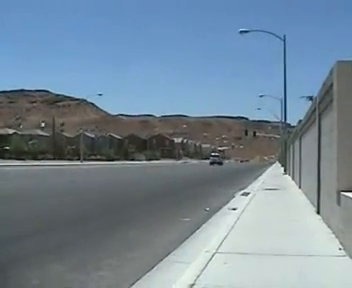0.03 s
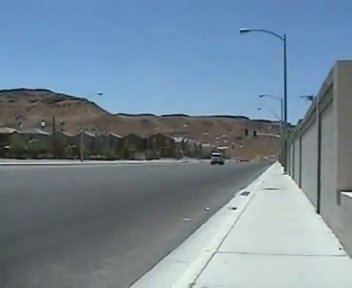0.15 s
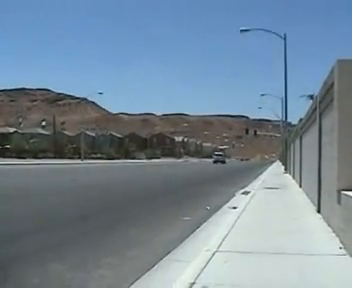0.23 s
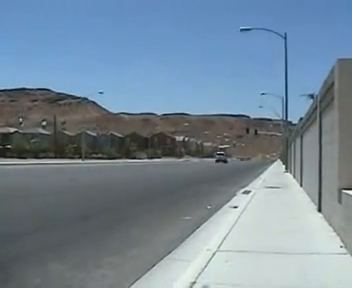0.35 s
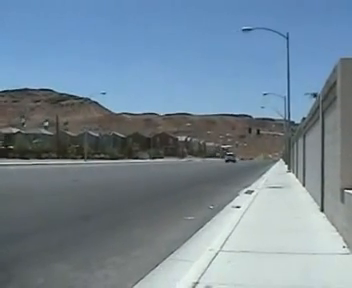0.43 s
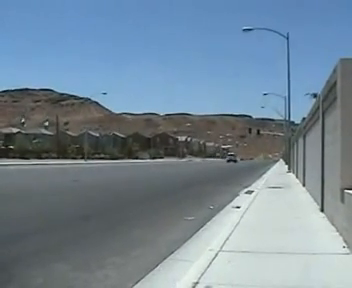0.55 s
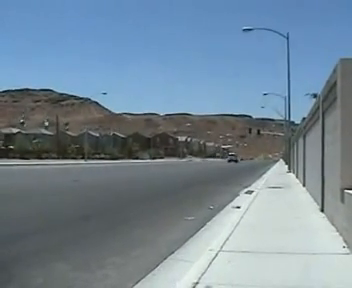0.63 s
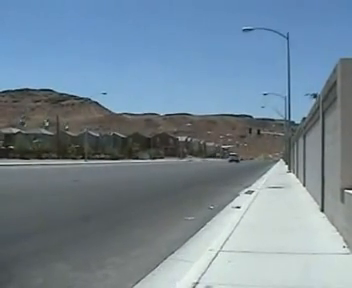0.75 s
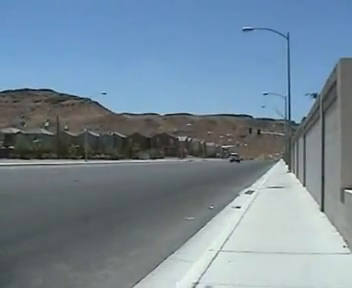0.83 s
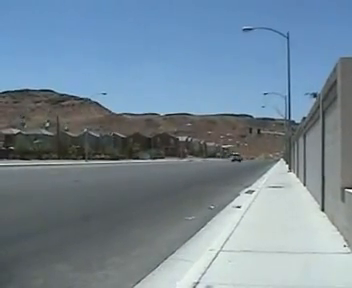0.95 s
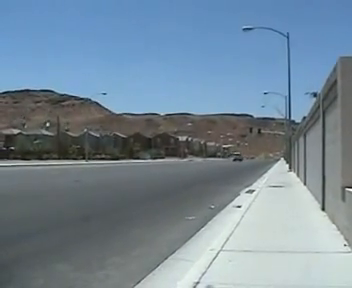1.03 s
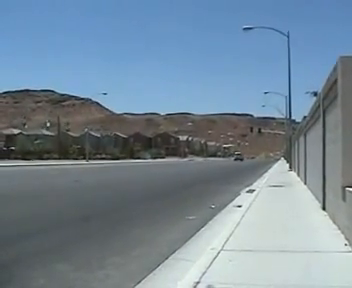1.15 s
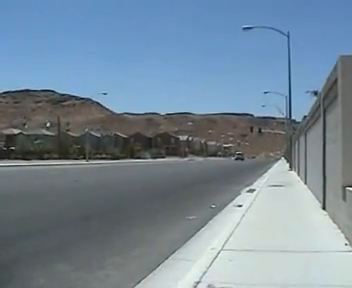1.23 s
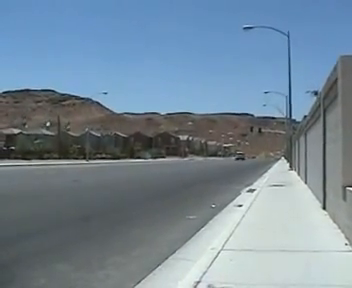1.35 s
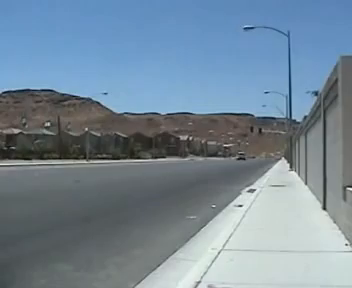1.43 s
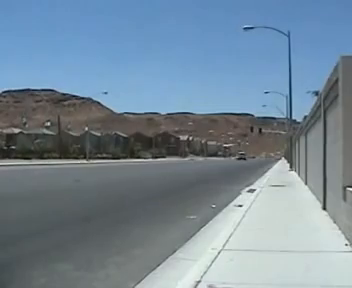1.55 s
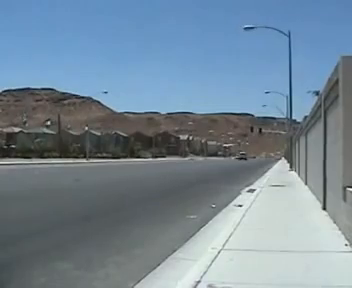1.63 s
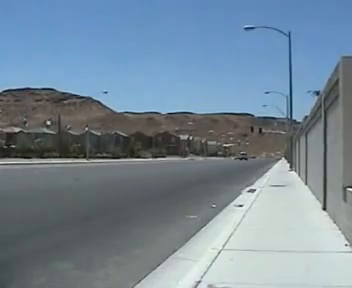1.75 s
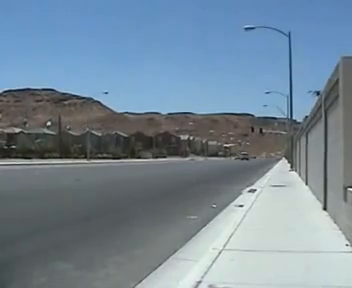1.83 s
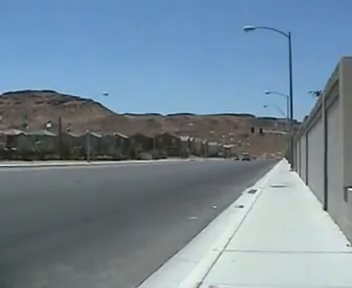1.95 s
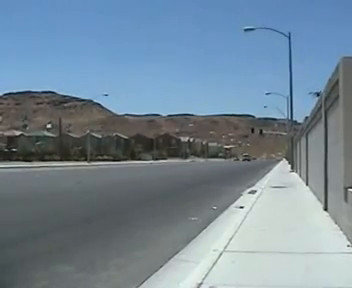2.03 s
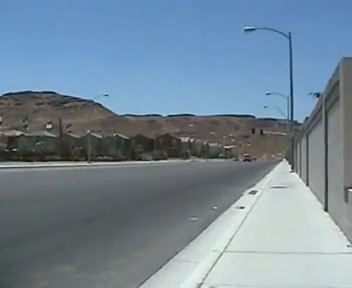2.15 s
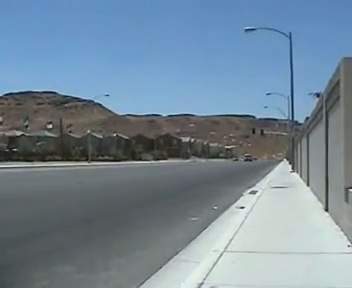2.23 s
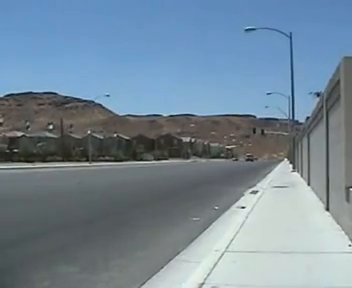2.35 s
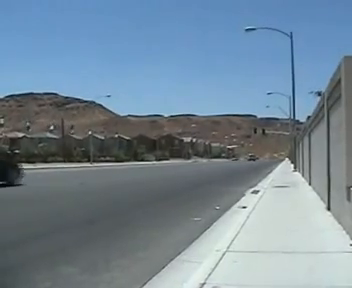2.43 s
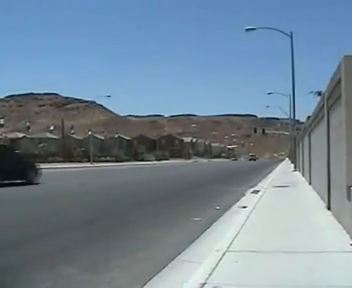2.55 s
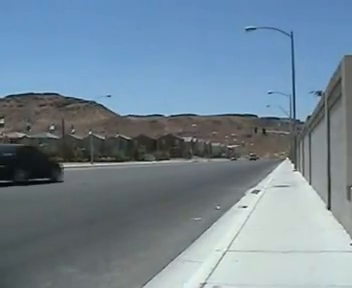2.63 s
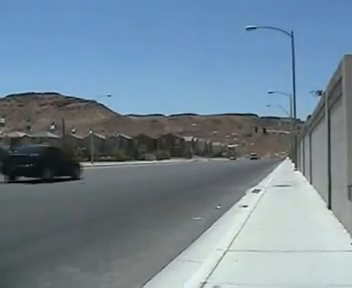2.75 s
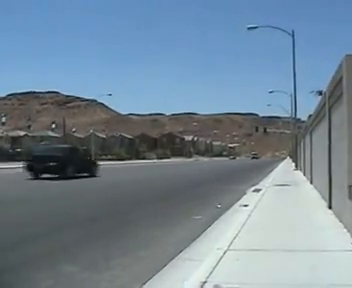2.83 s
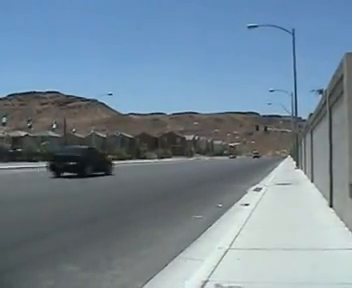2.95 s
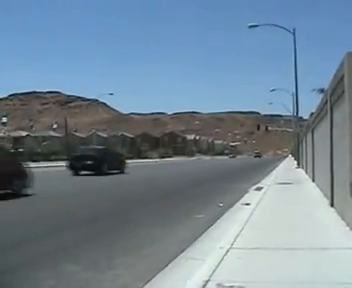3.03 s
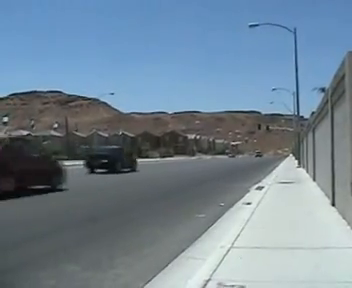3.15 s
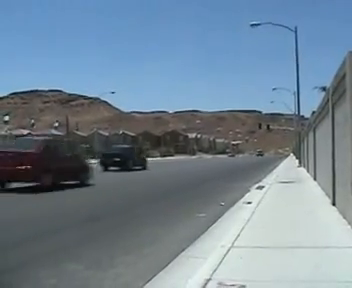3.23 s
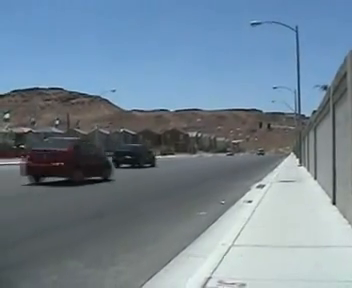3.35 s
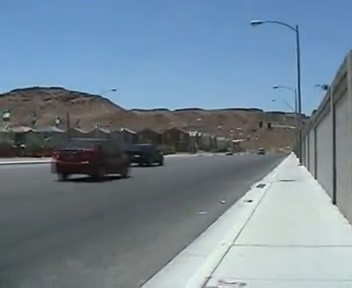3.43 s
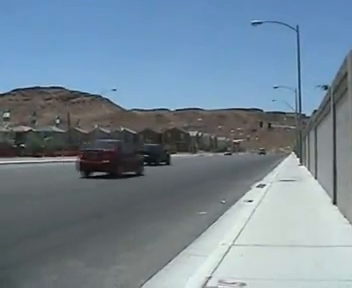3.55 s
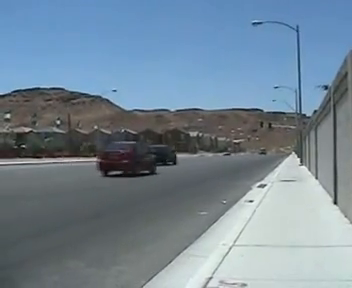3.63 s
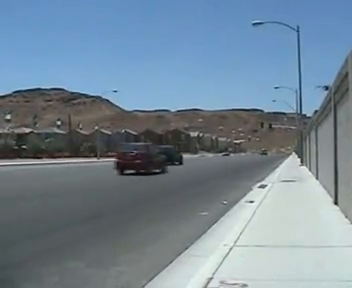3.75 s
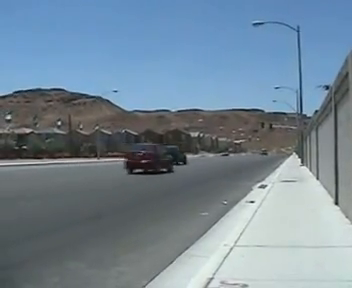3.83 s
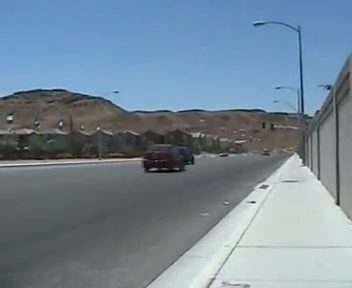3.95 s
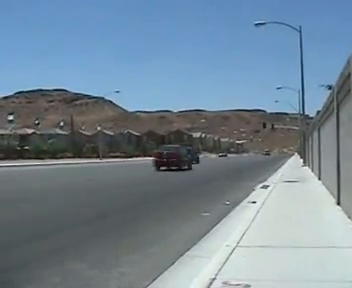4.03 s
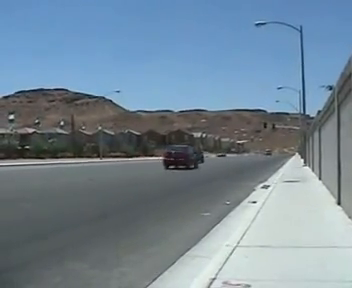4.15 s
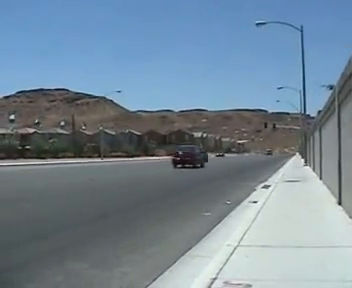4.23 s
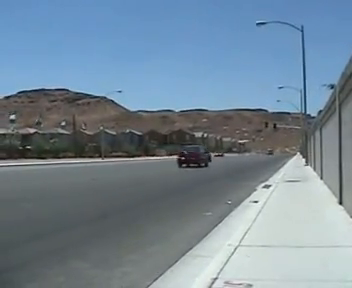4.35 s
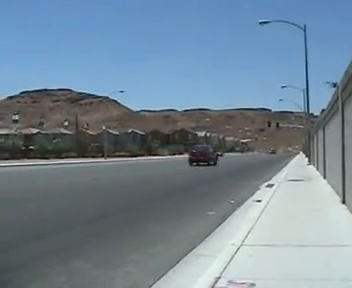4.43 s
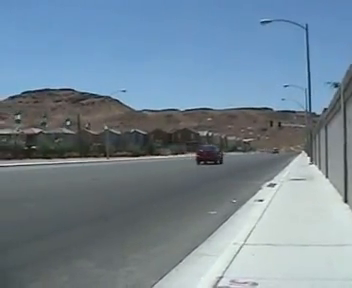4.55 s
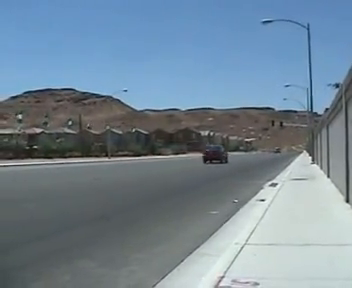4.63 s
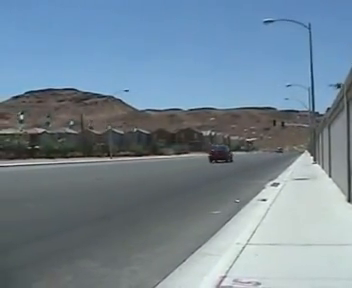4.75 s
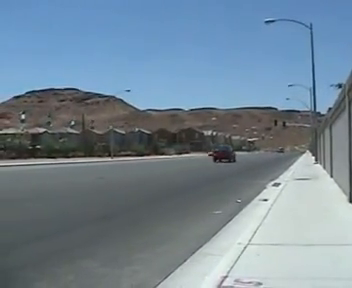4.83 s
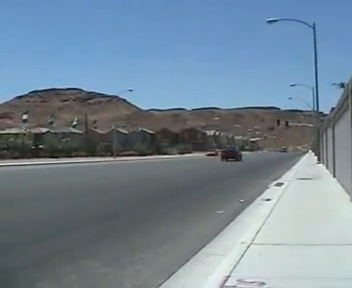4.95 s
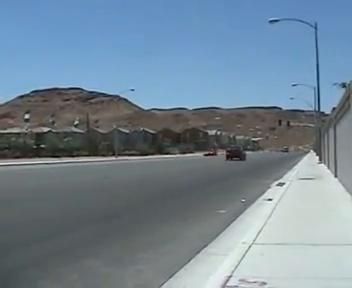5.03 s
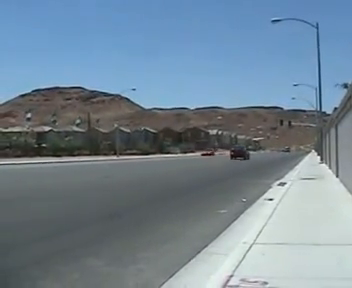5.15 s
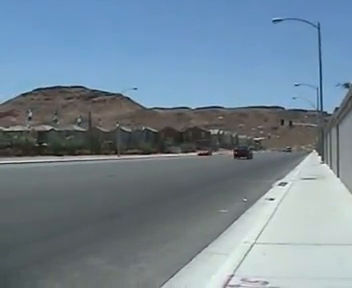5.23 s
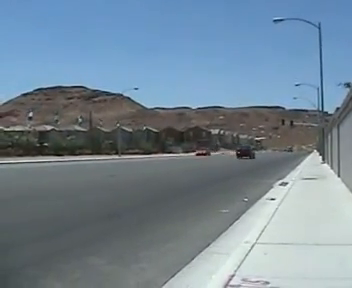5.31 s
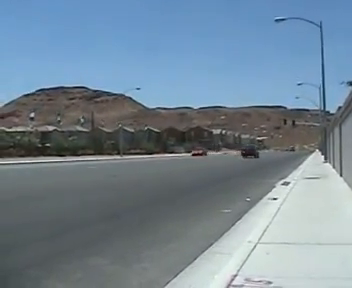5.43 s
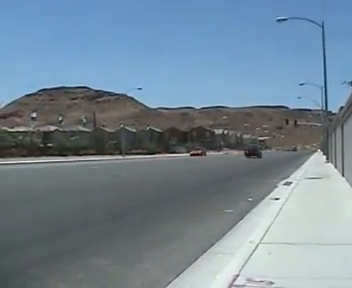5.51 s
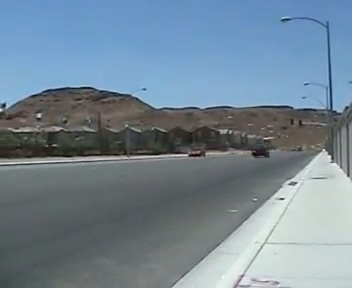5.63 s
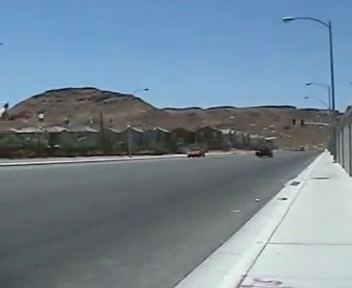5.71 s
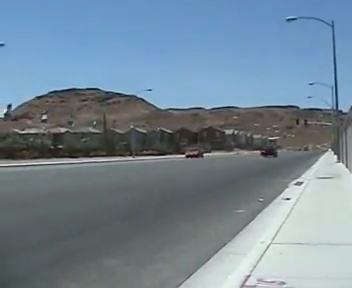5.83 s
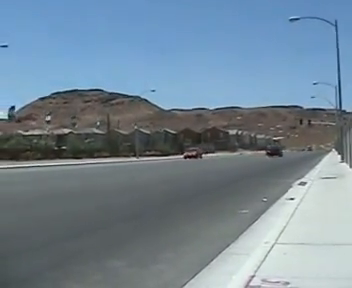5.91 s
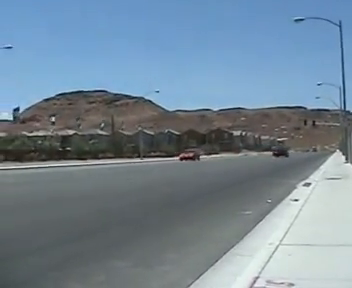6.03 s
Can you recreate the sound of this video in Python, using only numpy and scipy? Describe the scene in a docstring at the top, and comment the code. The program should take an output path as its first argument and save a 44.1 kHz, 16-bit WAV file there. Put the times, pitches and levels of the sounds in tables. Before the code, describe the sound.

A loud-exhaust four-cylinder car pulls hard, shifts up around the middle as another car rushes past, then lifts off with falling note and tyre chirps.

```python
"""From the start a four-cylinder car with a loud exhaust pulls beside a garden wall, over tyre roar, wind and rumble.
A second car then rushes past, its drone falling by the Doppler effect, while the first changes gear and faint
crackles of an overloaded input are heard. Late on come a tick, the throttle lift with an octave growing over the
falling note, and slip-and-grip tyre chirps. Tones are sines partly scattered by random modulation; roar, gas noise,
hiss, wind and crackles are shaped random noise. The input stage rounds the highest peaks throughout."""
import sys
import numpy as np
from scipy import signal
from scipy.fft import rfft, irfft, next_fast_len
from scipy.io import wavfile
from scipy.ndimage import uniform_filter1d, map_coordinates

SR = 44100
rng = np.random.default_rng(int(sys.argv[2]) if len(sys.argv) > 2 else 0)


def wrap_up_sound(samples):
    """Save the sound to the file named by the first command line argument, as 16-bit audio."""
    columns = np.atleast_2d(samples).T
    # keep every value between -1 and 1, then stretch to whole-number steps
    tamed = np.clip(columns, -1, 1)
    steps = np.round(tamed * 32767).astype(np.int16)
    wavfile.write(sys.argv[1], SR, steps)


N = 268128
T = np.arange(N) / SR  # time in seconds

# Engine speed and exhaust note. Each row: time in seconds, firing rate in Hz, note level in dB.
ENGINE_NOTE = [(0, 231, -25), (.1, 233.5, -24.5), (.45, 241.8, -26), (.84, 256, -19), (1.2, 268, -20.5),
               (1.47, 274.7, -18), (1.8, 286.7, -18), (2.2, 297.4, -15.5), (2.33, 299.5, -26.5),
               (2.5, 286.7, -23), (2.6, 278.8, -24), (2.66, 276, -16.5), (2.71, 271, -30),
               (2.78, 264.7, -33), (2.86, 235.4, -18), (2.96, 221, -19), (3.4, 230.8, -17.5),
               (3.8, 236.1, -20.5), (4.25, 246.2, -16.5), (4.66, 250, -17), (4.8, 251.2, -21),
               (5.05, 257.1, -18), (5.21, 255.2, -21), (5.23, 267.3, -16), (5.52, 232.7, -15.5),
               (5.75, 197, -12), (5.96, 171.1, -18.5), (6.08, 153.2, -10.5)]
# Brief drop-outs of the note. Each row: centre in seconds, half length (to 1/e) in seconds, depth in dB.
NOTE_DROPOUTS = [(0.315, 0.089, 10), (0.927, 0.045, 20), (1.062, 0.03, 14), (1.33, 0.027, 13),
                 (1.402, 0.03, 18), (1.567, 0.019, 13), (1.673, 0.013, 9), (1.858, 0.023, 16),
                 (1.992, 0.024, 13), (2.12, 0.045, 9), (2.416, 0.047, 8), (2.591, .025, 6),
                 (2.81, 0.033, 10), (3.087, .015, 7), (3.236, .015, 5), (3.524, 0.037, 15), (4.564, .03, 5),
                 (4.74, 0.012, 13), (5.017, .02, 6), (5.221, 0.0096, 19), (5.327, 0.0046, 16)]
# Growl under load. Each row: time in seconds, 3rd multiple of the cycle rate in dB, 5th in dB, rasp in dB.
GROWL_LEVELS = [(0, -42, -39.5, -41), (.85, -43.5, -38.5, -43), (.98, -26, -45, -37.5),
                (1.27, -26.5, -33.5, -41), (1.38, -48, -38.5, -46), (1.55, -36.5, -33.5, -48),
                (2.1, -29.5, -42, -37), (2.27, -25, -38, -35), (2.35, -35, -36, -35),
                (2.46, -22.5, -38, -33), (2.6, -35, -39, -28), (2.75, -25, -36, -29),
                (2.95, -49, -33, -34.5), (3.3, -38, -36, -27.5), (3.5, -38, -39, -27),
                (3.8, -37.5, -40, -28.5), (3.95, -34, -36, -28.5), (4.15, -29, -32, -29),
                (4.45, -29, -26.5, -35.5), (4.56, -28.5, -31, -28), (5.0, -27.5, -33.5, -27),
                (5.27, -28, -33, -29)]
# Upper lines of the growl. Each row: multiple of the cycle rate, level in dB relative to the rasp.
RASP_LINES = [(10, -12), (11, -1.5), (12, -5), (13, -14.5)]
# Colour of the gas noise from the tailpipe. Each row: frequency in Hz, relative density in dB per Hz.
PIPE_SPECTRUM = [(350, -43), (600, -1.5), (750, 6), (900, -13), (1100, 3.5), (1400, -15), (3000, -21),
                 (6000, -120)]
# Whines near 1 kHz. Each row: start in seconds, length in seconds, start pitch in Hz, end pitch in Hz, level in dB.
WHINE_GLIDES = [(.85, 0.28, 899, 908, -33.5), (3.75, .16, 1155, 1105, -26), (3.97, 0.062, 1140, 1165, -28),
                (4.53, .36, 1072, 1082, -29), (4.96, .17, 1069, 1085, -29)]
# Singing tyres of the passing car. Each row: multiple of its drone, level in dB abreast.
PASSING_TYRE_LINES = [(3.7, -28), (5.1, -29.5), (3.3, -30)]
# Tyre chirps. Each row: start in seconds, length in seconds, start pitch in Hz, end pitch in Hz, level in dB.
CHIRP_GLIDES = [(5.805, 0.0093, 830, 812, -25.5), (5.85, 0.027, 866, 900, -21),
                (5.865, 0.02, 1075, 1103, -30), (5.928, 0.03, 854, 893, -21.5),
                (5.975, 0.037, 900, 850, -26.5), (5.98, 0.015, 1130, 1110, -28.5)]
# Colour of the scrubbing rubber. Each row: frequency in Hz, relative density in dB per Hz.
SCRUB_SPECTRUM = [(500, -36), (1100, -2.0), (2000, 5.5), (4500, -14.0), (7300, -34), (8500, -92.0)]
# A tick close to the microphone. Each row: start in seconds, scale of the ringing in dB.
TICK_TIMES = [(5.1549, -20)]
# Its modes. Each row: frequency in Hz, level in dB relative to that scale, 60 dB decay time in seconds.
TICK_MODES = [(4325, -1.5, 0.0038), (6745, 6.0, 0.0025), (8510, -10, 0.0046), (13020, -14, .004)]
# Traffic. Each row: time in seconds, tyre roar in dB, hiss in dB, hiss brightness in dB per octave.
ROAD_LEVELS = [(0, -24, -45, 1.5), (.8, -25.5, -44.5, -2), (.92, -22.5, -39.5, -10),
               (1.26, -22.5, -36.5, -3), (1.55, -19, -28, -7.5), (1.7, -17, -27, -4), (1.9, -18, -27.5, 1),
               (2.01, -15.5, -26, -1.5), (2.15, -17.5, -27, 0), (2.45, -15.5, -27, 3.5),
               (2.8, -16, -25, 0.5), (2.92, -18, -25.5, -0.5), (3.17, -17.5, -29, 3.5),
               (3.27, -17.5, -26.5, 2.5), (3.58, -18.5, -25.5, 1), (3.72, -22.5, -28, -1.5),
               (3.79, -18.5, -26.5, -0.5), (3.97, -20.5, -26.5, 0.5), (4.12, -20.5, -32, -1.5),
               (4.7, -22.5, -32.5, -2.5), (5.2, -22, -30.5, -7), (5.3, -23.5, -33.5, -5.5),
               (5.42, -24, -35.5, -4.5), (5.53, -23, -35, -5.5), (5.72, -28.5, -40, -9),
               (5.8, -25.5, -36, -11)]
# Sliding humps in the roar as cars pass. Each row: time in seconds, centre in Hz, lift in dB before sharing.
TREAD_HUMPS = [(0, 894, -2.5), (1.7, 1034, -3.5), (2.1, 979.7, 7.5), (2.5, 830, 6), (3.3, 929, 6),
               (3.6, 980, 5), (3.75, 1130, 8), (4.1, 1197, 2.5), (4.4, 1100, -1.5), (6.08, 1155, 4)]
# Colour of the tyre roar. Each row: frequency in Hz, relative density in dB per Hz.
ROAR_SPECTRUM = [(90, -35), (150, -10), (210, 1.5), (270, 0), (340, -5.5), (440, -5.5), (560, -5.5),
                 (760, -3.5), (1070, -2), (1400, -7), (1810, -15.5), (2600, -31), (3600, -68), (6000, -120)]
# Colour of the hiss. Each row: frequency in Hz, relative density in dB per Hz.
HISS_SPECTRUM = [(1000, -14), (1700, 1), (2500, -10.5), (3500, -18.5), (5000, -30.5), (6500, -35.5),
                 (7400, -41.5), (8200, -48.5), (10000, -57), (12600, -60.5), (13300, -120)]
# Wind and road. Each row: time in seconds, wind buffeting in dB, rumble of the road in dB.
WIND_LEVELS = [(0, -45, -41.5), (.35, -42, -37), (.6, -46, -40), (1.2, -40, -39.5), (1.8, -42, -35.5),
               (2.2, -49, -38.5), (2.6, -45, -38.5), (3.2, -52, -38.5), (3.62, -49, -37), (3.72, -37, -39),
               (3.85, -44, -41), (4.5, -46, -42.5), (5, -50, -39.5), (5.3, -53, -41), (5.75, -54, -45),
               (5.85, -46, -44), (6.08, -42.5, -39)]
# Colour of the buffeting. Each row: frequency in Hz, relative density in dB per Hz.
BUFFET_SPECTRUM = [(12, -39.5), (20, -10.5), (45, 0.5), (65, -3), (90, -20.5), (150, -120)]
# Colour of the road rumble. Each row: frequency in Hz, relative density in dB per Hz.
RUMBLE_SPECTRUM = [(30, -59.5), (60, -12), (80, -0.5), (135, -2.5), (151, -8), (170, -13.5), (220, -22.5),
                   (370, -120)]
# A faint low hum. Each row: start in seconds, length in seconds, start pitch in Hz, end pitch in Hz, level in dB.
HUM_GLIDES = [(3.85, .8, 53.12, 52.4, -48)]
# Colour of the steady far hiss. Each row: frequency in Hz, relative density in dB per Hz.
AIR_SPECTRUM = [(2500, -17.5), (3500, -6.5), (4600, -2.5), (5050, 5.5), (5400, -7), (5900, 0), (6400, -14),
                (9000, -13), (12400, -15.5), (13000, -29.5), (13400, -89.5)]
# Faint crackles of the overloaded input. Each row: start in seconds, level in dB before rise and decay.
CRACKLE_TIMES = [(1.764, -50), (1.8973, -51), (2.0214, -46), (2.1022, -49), (2.2608, -46), (2.3137, -49),
                 (2.3596, -46), (2.4883, -46), (2.618, -50), (2.6963, -47), (2.8026, -45), (3.0086, -49),
                 (3.1475, -47), (3.3558, -46)]
# Colour of the crackles. Each row: frequency in Hz, relative density in dB per Hz.
CRACKLE_SPECTRUM = [(2500, -59), (4000, 5), (7000, 2), (10000, -2), (13000, -7), (15000, -14)]

SHIFT_S, LIFT_S = 2.4, 5.27  # gear change; foot off the throttle
ROUGH_LOW, ROUGH_HIGH = .09, .06  # scattered share of the note before and after the gear change
OCTAVE_DB = -18.5  # octave of the firing note under load, relative to the note
OVERRUN_S, OVERRUN_HOLD_S, OVERRUN_EDGE_S = 5.73, .22, .05
OVERRUN_DB, OVERRUN_AFTER_DB = -32, -39  # octave off the throttle: swell, then what remains
PASS_S, PASS_M_PER_S, PASS_M, PASS_HZ = 2.65, 31, 16, 219.7  # moment abreast, speed, distance, drone
PASS_DB, PASS_OCTAVE_DB, PASS_AHEAD_DB = -30, -26, 5  # levels abreast; louder while it comes
PASS_HEARD_S, PASS_TYRES_S = (1.62, 2.75), (2.4, 2.75)  # (start, end) between the fades
SCUFF_S, SCUFF_HOLD_S, SCUFF_EDGE_S = 5.8, .09, 0.017
SCUFF_DB, SCUFF_TAIL_DB = -37, -44.5  # rubber scrubbing, then a faint drag
CRACKLE_T60_S, CRACKLE_RISE_S = .045, .003
SOUND_M_PER_S = 343
TOP_HZ, TOP_FADE_HZ = 15100, 2400  # band limit and width of the fade below it


def amp(db):
    """Decibel law: twenty decibels are a factor of ten in amplitude."""
    return 10 ** (np.asarray(db) / 20)


def unit(x):
    """Normalization to an rms of 1."""
    return x / np.sqrt(np.mean(np.abs(x) ** 2) + 1e-20)


def along(points, hz):
    """Linear interpolation of (Hz, value) points on a logarithmic frequency axis."""
    f, v = np.transpose(points)
    return np.interp(np.log(hz + 1), np.log(f + 1), v)


def curves(rows, t=T):
    """Linear interpolation in time, lightly smoothed, of each column after the first."""
    s, *columns = np.transpose(rows)
    width = 1 + len(t) // 600
    return [uniform_filter1d(np.interp(t, s, column), size=width) for column in columns]


def fades(start, end, edge):
    """Gating: 1 from start to end, with squared ramps of length edge outside."""
    inside = np.minimum(T - start, end - T)
    return np.clip(inside / edge + 1, 0, 1) ** 2


def wobble(rate):
    """Band-limited random fluctuation: a spline through random knots, rate of them a second."""
    knots = rng.standard_normal(int(N * rate / SR) + 4)
    return map_coordinates(knots, [T * rate])


def filtered(x, response):
    """Linear filtering: the spectrum is multiplied by a response of frequency."""
    m = next_fast_len(N + 8192)
    spectrum = rfft(x, m) * response(np.fft.rfftfreq(m, 1 / SR))
    return irfft(spectrum, m)[..., :N]


def partial(hz, db, rough, rate):
    """Random modulation of a sine of rms db: uneven firing and echoes scatter the share rough."""
    rough = np.clip(rough, 0, 1)
    scatter = unit(wobble(rate) + 1j * wobble(rate))
    turns = np.exp(2j * np.pi * (np.cumsum(hz) / SR + rng.random()))
    steady_and_scattered = np.sqrt(1 - rough) + np.sqrt(rough) * scatter
    return amp(db) * np.sqrt(2) * np.real(turns * steady_and_scattered)


def glides(rows, rough, edge):
    """Frequency modulation: short tones slide linearly from one pitch to another."""
    out = np.zeros(N)
    for s, length, start_hz, end_hz, db in rows:
        hz = np.interp(T, [s, s + length], [start_hz, end_hz])
        out += partial(hz, db, rough, 50) * fades(s, s + length, edge)
    return out


def rush(spectrum, patchy_db, shape_db=lambda hz, t: 0):
    """Spectral shaping: noise brought to rms 1 takes patches of random gain and a moving colour."""
    noise = unit(filtered(rng.standard_normal(N), lambda f: amp(along(spectrum, f))))
    hz, t, z = signal.stft(noise, SR, nperseg=1024)
    across_hz = uniform_filter1d(rng.standard_normal(z.shape), 8, 0)
    patches = unit(uniform_filter1d(across_hz, 6, 1))
    gain_db = patchy_db * patches + shape_db(hz[:, None], t)
    return signal.istft(z * amp(gain_db), SR, nperseg=1024)[1][:N]


def firing():
    """Firing periodicity: the rate in Hz, and the level in dB of its note with the drop-outs."""
    hz, db = curves(ENGINE_NOTE)
    for s, half_s, depth_db in NOTE_DROPOUTS:
        db = db - depth_db * np.exp(-((T - s) / half_s) ** 2)
    return hz, db


def exhaust():
    """Periodic excitation: the pulses give a tone at the firing rate, cleaner in the higher gear."""
    hz, note_db = firing()
    rough = np.where(T < SHIFT_S, ROUGH_LOW, ROUGH_HIGH)
    return partial(hz, note_db, rough, 25)


def growl():
    """Subharmonics: four unequal firings a cycle give lines on multiples of its rate, and puffing gas noise."""
    firing_hz, note_db = firing()
    cycle_hz = firing_hz / 4
    third_db, fifth_db, rasp_db = curves(GROWL_LEVELS)
    flutter_db = 1.1 * wobble(12)  # echoes off the wall come and go
    note = partial(3 * cycle_hz, third_db + flutter_db, .2, 20)
    note += partial(5 * cycle_hz, fifth_db + flutter_db, .3, 25)
    note += partial(2 * firing_hz, note_db + OCTAVE_DB + flutter_db, 0.66, 25)
    for order, db in RASP_LINES:
        note += partial(order * cycle_hz, rasp_db + db, .1, 14)
    puffs = unit(np.exp(0.76 * np.cos(2 * np.pi * np.cumsum(cycle_hz) / SR)))
    note += amp(rasp_db + 1.5) * puffs * rush(PIPE_SPECTRUM, 0.68)
    return note * fades(0, LIFT_S, 0.026)


def overrun():
    """Second harmonic: off the throttle, the falling note grows an octave."""
    hold_end = OVERRUN_S + OVERRUN_HOLD_S
    swell = amp(OVERRUN_DB) * fades(OVERRUN_S, hold_end, OVERRUN_EDGE_S)
    after = amp(OVERRUN_AFTER_DB) * fades(hold_end, T[-1], OVERRUN_EDGE_S)
    octave = partial(2 * firing()[0], 0, 0.14, 25)
    return octave * np.maximum(swell, after)


def whines():
    """Gliding tones: narrow whines near 1 kHz, one early and the others after the second car has passed."""
    return glides(WHINE_GLIDES, .2, .04)


def passing_car():
    """Doppler effect to first order and inverse distance law: the drone falls as it draws level and leaves."""
    beyond_m = PASS_M_PER_S * (T - PASS_S)  # negative while it approaches
    away_m = np.hypot(beyond_m, PASS_M)
    leaving = beyond_m / away_m  # cosine of the path angle
    hz = PASS_HZ * (1 - PASS_M_PER_S / SOUND_M_PER_S * leaving)
    drone = partial(hz, PASS_DB, .35, 25) + partial(2 * hz, PASS_OCTAVE_DB, .6, 45)
    singing = sum(partial(ratio * hz, db, 0.38, 20) for ratio, db in PASSING_TYRE_LINES)
    drone += fades(*PASS_TYRES_S, .2) * singing
    return drone * PASS_M / away_m * amp(-PASS_AHEAD_DB * leaving) * fades(*PASS_HEARD_S, 0.78)


def tyre_chirps():
    """Stick-slip friction: rubber slips and grips in short squeals over a scrub of noise."""
    hold_end = SCUFF_S + SCUFF_HOLD_S
    level = amp(SCUFF_DB) * fades(SCUFF_S, hold_end, SCUFF_EDGE_S)
    level += amp(SCUFF_TAIL_DB) * fades(SCUFF_S, T[-1], SCUFF_EDGE_S)
    return glides(CHIRP_GLIDES, .1, .01) + level * rush(SCRUB_SPECTRUM, 1.6)


def tick():
    """Modal ringing: a hard contact excites damped sines, with a faint decaying bright noise."""
    out, t = np.zeros(N), np.arange(600) / SR
    onset = 1 - np.exp(-t / 0.00019)
    for s, db in TICK_TIMES:
        ring = sum(amp(level - 60 * t / t60) * np.sin(2 * np.pi * hz * t) for hz, level, t60 in TICK_MODES)
        ring += np.diff(rng.standard_normal(len(t) + 1)) * amp(-25 - 60 * t / 0.032)
        out[round(s * SR):][:len(t)] += amp(db) * ring * onset
    return out


def tyre_roar():
    """Broadband rolling noise: roar with sliding tread humps, and hiss above it."""
    roar_db, hiss_db, _ = curves(ROAD_LEVELS)

    def hiss_tilt(hz, t):
        """Spectral slope: dB per octave from 3 to 8 kHz, level beyond."""
        return curves(ROAD_LEVELS, t)[2] * np.log2(np.clip(hz, 3000, 8000) / 3000)

    def roar_colour(hz, t):
        """Spectral emphasis: two tread humps and a slope from 1 to 2.5 kHz."""
        centre_hz, lift_db = curves(TREAD_HUMPS, t)
        tread_db = 0
        for ratio, share in [(1, 0.93), (1.2, 0.53)]:
            distance = np.log((hz + 1) / (ratio * centre_hz)) / 0.058
            tread_db = tread_db + share * lift_db * np.exp(-distance ** 2)
        roar_now_db, hiss_now_db, _ = curves(ROAD_LEVELS, t)
        near_db = hiss_now_db - roar_now_db + 11  # close tyres hiss more and roar brighter
        return tread_db + 0.72 * near_db * np.log2(np.clip(hz, 1000, 2500) / 1000)

    gust = wobble(7)
    roar = amp(roar_db + 0.28 * gust) * rush(ROAR_SPECTRUM, 1.22, roar_colour)
    hiss = amp(hiss_db + 0.5 * gust + 0.52 * wobble(12)) * rush(HISS_SPECTRUM, 1.5, hiss_tilt)
    return roar + hiss


def wind_and_rumble():
    """Turbulent pressure fluctuation: low noise for wind buffeting, and for the rumble of the road."""
    buffet_db, rumble_db = curves(WIND_LEVELS)
    buffeting = amp(buffet_db + 1.5 * wobble(5)) * rush(BUFFET_SPECTRUM, 1.2)
    rumble = amp(rumble_db + wobble(5)) * rush(RUMBLE_SPECTRUM, 1.2)
    return buffeting + rumble


def low_hum():
    """Gliding tone: a faint low hum sinks slightly in pitch."""
    return glides(HUM_GLIDES, .2, .15)


def far_air():
    """Stationary noise: a steady far hiss."""
    return amp(-65.0) * rush(AIR_SPECTRUM, 1.1)


def crackles():
    """Overload distortion: faint crackles of the input, imitated at set times by short bursts of bright noise."""
    envelope, t = np.zeros(N), np.arange(SR // 10) / SR
    rise = 1 - np.exp(-t / CRACKLE_RISE_S)
    for s, db in CRACKLE_TIMES:
        envelope[round(s * SR):][:len(t)] += amp(db - 60 * t / CRACKLE_T60_S) * rise
    return envelope * rush(CRACKLE_SPECTRUM, 2.5)


def scene():
    """Superposition: all sources add at one microphone, and the crackles of its input join them."""
    car = exhaust() + growl() + overrun() + whines()
    events = passing_car() + tyre_chirps() + tick()
    background = tyre_roar() + wind_and_rumble() + low_hum() + far_air()
    return (car + events + background + crackles())[None]


def record(dry):
    """Saturation, then filtering: the input stage rounds peaks, a coupling capacitor cuts lows, the top fades."""
    ceiling, bend = .72, 7
    soft = dry / (1 + np.abs(dry / ceiling) ** bend) ** (1 / bend)

    def response(hz):
        """First-order high-pass at 30 Hz times a linear fade to the band limit."""
        capacitor = 1j * hz / (30 + 1j * hz)
        return np.clip((TOP_HZ - hz) / TOP_FADE_HZ, 0, 1) * capacitor

    return filtered(soft, response)


dry = scene()
out = record(dry)
wrap_up_sound(out)
```